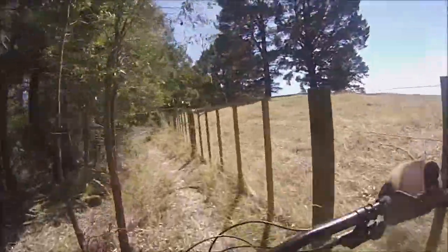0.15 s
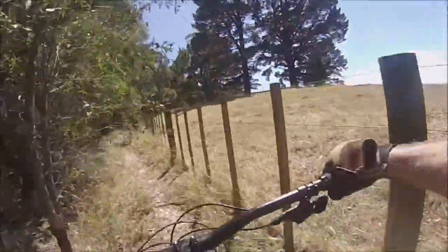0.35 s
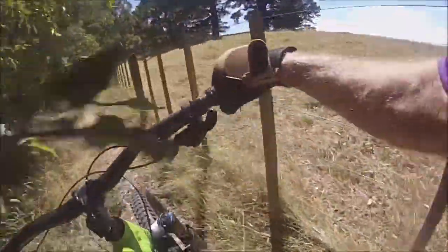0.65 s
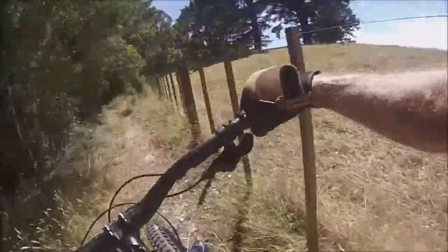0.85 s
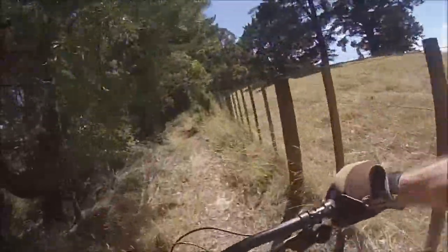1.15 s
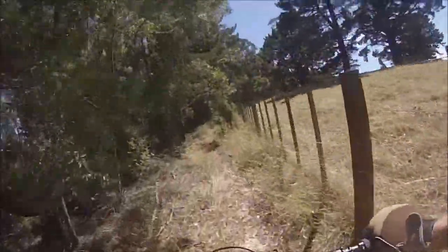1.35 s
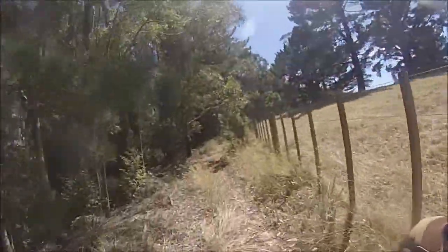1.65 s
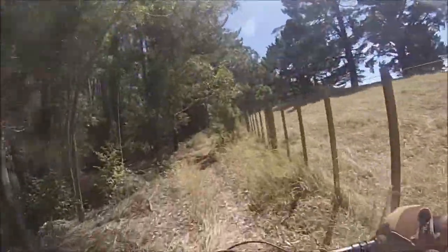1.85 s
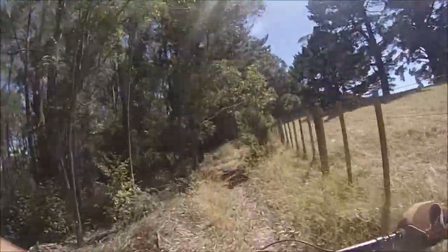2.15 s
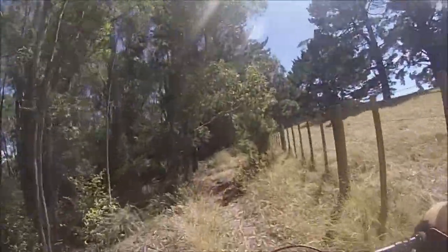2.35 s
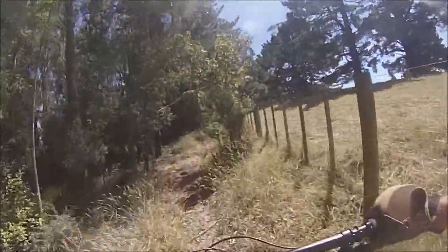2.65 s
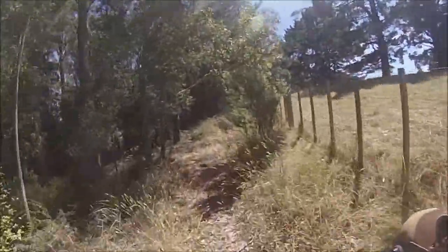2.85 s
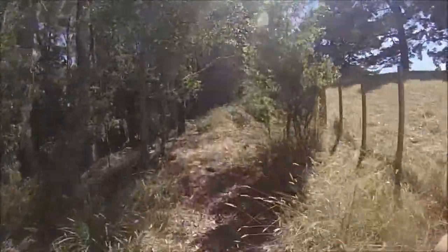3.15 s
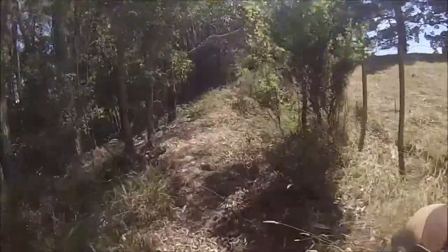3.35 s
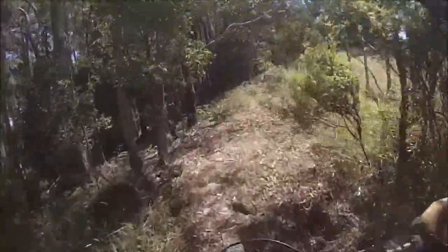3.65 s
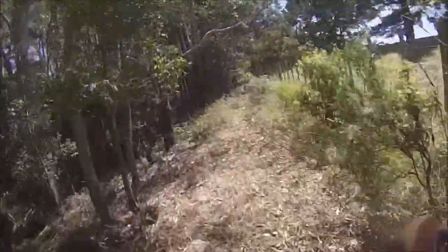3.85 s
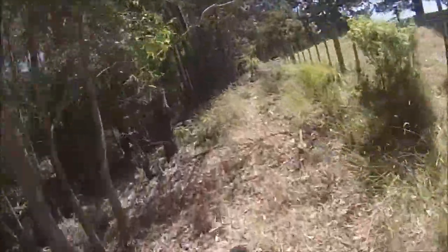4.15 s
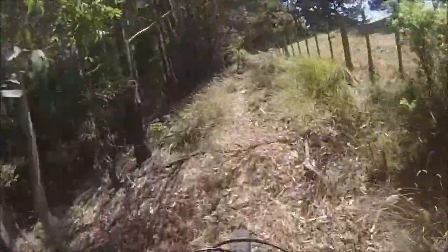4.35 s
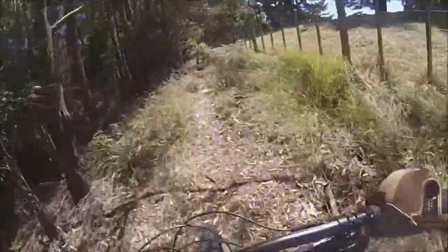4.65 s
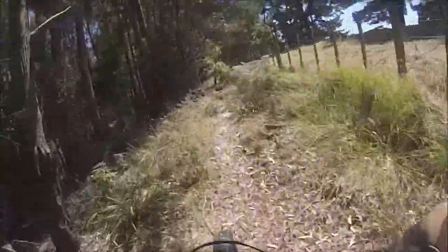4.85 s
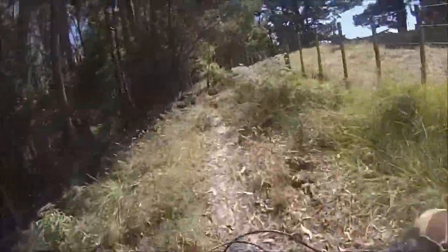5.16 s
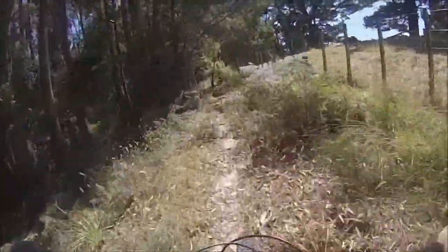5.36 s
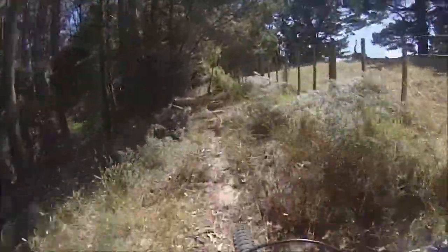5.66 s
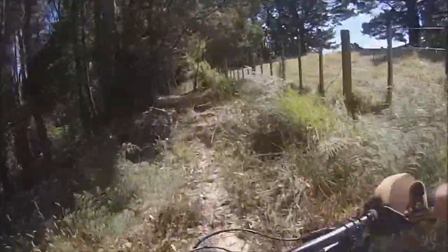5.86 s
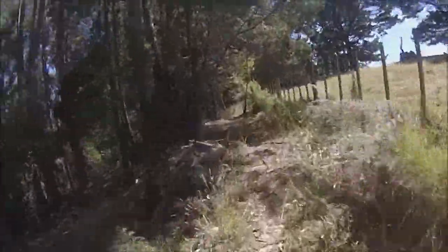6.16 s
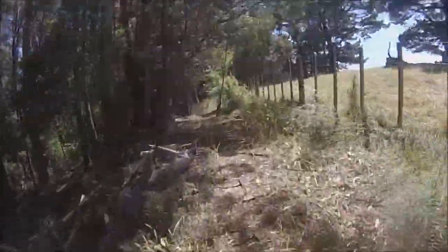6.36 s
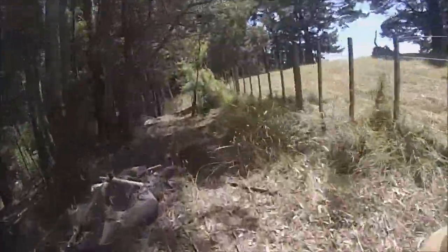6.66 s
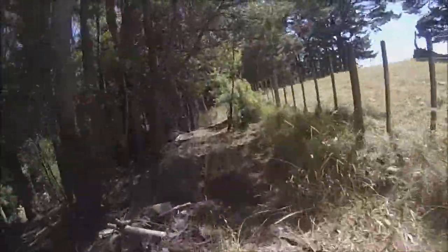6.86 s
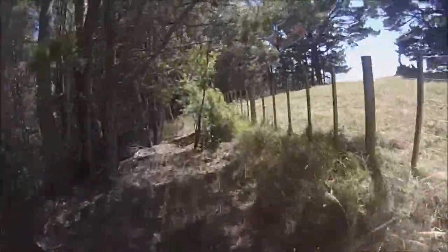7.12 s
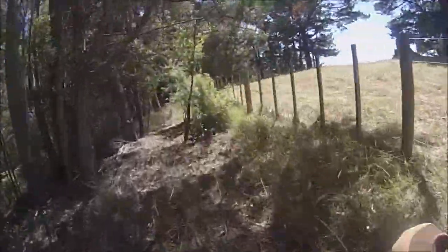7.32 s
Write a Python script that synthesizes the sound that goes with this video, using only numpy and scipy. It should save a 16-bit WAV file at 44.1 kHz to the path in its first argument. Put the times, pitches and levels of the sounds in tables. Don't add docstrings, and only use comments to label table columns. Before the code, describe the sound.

A mountain bike rattles along a dry dirt trail, its helmet camera knocking in a loose mount, with one loud branch scrape early on.

```python
import sys
import numpy as np
from scipy import signal
from scipy.fft import rfft, irfft, next_fast_len
from scipy.io import wavfile
from scipy.ndimage import uniform_filter1d, map_coordinates

SR = 44100
rng = np.random.default_rng(int(sys.argv[2]) if len(sys.argv) > 2 else 0)


def int16_out(signal):
    q = np.round(np.clip(np.atleast_2d(signal).T, -1, 1) * 32767)
    wavfile.write(sys.argv[1], SR, q.astype(np.int16))


def volts_from_decibels(level):
    exponent = np.asarray(level, float) / 20
    return 10 ** exponent


N = 330309

# freq_hz, density_db
WIND_SPECTRUM = [(4.7, -31), (8.0, 0), (30, 0.5), (41, -9.5), (59, -28), (70, -26), (91, -56), (150, -120)]
# peak_s, peak_db, half_length_s
GUSTS = [(0.02, -48, 0.079), (0.28, -32, 0.086), (0.527, -33, 0.061), (0.717, -31, 0.063),
         (0.952, -42, 0.13), (1.259, -31.5, 0.088), (1.472, -44.5, 0.19), (1.775, -42.5, 0.052),
         (1.925, -29, 0.01), (2.11, -52, 0.069), (2.333, -39, 0.054), (2.69, -40, 0.16),
         (3.067, -41, 0.092), (3.333, -36, 0.08), (3.64, -50, 0.11), (3.826, -50, 0.18), (4.138, -48, 0.14),
         (4.447, -33, 0.14), (4.736, -41, 0.047), (4.925, -45, 0.052), (5.087, -57, 0.027),
         (5.303, -44, 0.41), (5.64, -49, 0.22), (5.994, -25.5, 0.039), (6.24, -39.5, 0.089),
         (6.5, -42, 0.34), (6.858, -37.5, 0.18), (7.34, -47, 0.17)]
BREEZE_DB = -50
# freq_hz, density_db
RUMBLE_SPECTRUM = [(32, -29), (55, 5), (171, -3.5), (204, -7), (306, -14), (339, -11.5), (500, -22),
                   (650, -45.5), (1100, -120)]
# time_s, level_db
BUMPS = [(0, 4), (.45, 1), (.65, -3), (.86, 4.5), (1.3, 3.5), (1.6, -2), (2.2, 2.5), (2.32, 2), (2.85, 2),
         (3.3, -4.5), (3.6, 3), (3.85, 0.5), (4.4, -0.5), (4.85, -2.5), (5.65, 4.5), (6.05, -0.5),
         (7.2, 3.5), (7.49, -4.5)]
# freq_hz, density_db
TYRE_SPECTRUM = [(150, -33.5), (250, -3), (726, -3), (944, -5), (1390, -10), (2390, -7.5), (2740, -8.5),
                 (5000, -23.5), (6500, -48), (11000, -120)]
# freq_hz, width_hz, gain_db
CASE_AIR = [(1510, 280, 0), (2170, 150, -2.5), (2730, 120, 5.5), (3420, 340, 4.5), (3920, 120, 7)]
# freq_hz, density_db
RUSTLE_SPECTRUM = [(2650, -37), (4500, -7), (5070, -8.5), (5540, -1.5), (6510, -1.5), (7490, -7),
                   (8140, -8), (8990, -13.5), (10400, -7.5), (11700, -6.5), (12800, -16.5), (14700, -19),
                   (15600, -31.5)]
# time_s, level_db
GRASS = [(0, 0), (.27, 0.5), (.43, -0.5), (.64, 4.5), (1.2, 2.5), (1.85, -2.5), (2.18, -3), (2.5, -1),
         (3.1, 0.5), (3.62, 4), (3.8, 2.3), (4.28, 0), (4.9, 1.6), (5.15, 5), (5.95, -1), (6.25, 4),
         (6.9, -2), (7.49, -1.5)]
# peak_s, level_db, half_length_s
TUFTS = [(.18, 3.5, 0.018), (0.3, 4.5, 0.028), (3.53, 4.5, 0.013), (3.58, 2, .02), (3.71, 5, 0.016),
         (4.146, 2.5, .03), (4.28, 7, 0.08), (4.38, -0.5, 0.033), (4.535, 6, 0.019), (4.607, -2.5, .02),
         (4.64, 6, 0.017), (4.704, 4.5, .015), (5.26, 4, 0.039), (5.33, -3, .015), (5.44, -3.5, 0.037),
         (5.776, 3, 0.027), (5.85, -1, 0.0099), (6.016, -2.5, 0.044), (6.077, -1.5, 0.019),
         (6.14, -6, .015), (6.22, 3.5, 0.045), (6.322, -4, 0.028), (6.47, 5, 0.037), (6.74, -1, 0.017),
         (7.4, 1.5, .03)]
RUMBLE_DB, TYRE_DB, RUSTLE_DB = -53, -58.5, -64
TYRE_PER_BUMP, TYRE_PER_GRASS = 0.28, 0.4
DUCK_S, DUCK_DB, DUCK_HOLD_S, DUCK_RECOVER_S = 0.8, -16.5, 0.27, 0.59

# start_s, peak_db, ring_hz, t60_s
STONES_AND_GRIT = [(0.077, -41.5, 2620, 0.023), (0.2573, -30.5, 1430, 0.0051), (.8144, -65, 1940, 0.034),
                   (0.8687, -56, 812, 0.023), (.929, -54, 865, 0.029), (1.4315, -50, 2654, 0.017),
                   (1.5759, -43, 2600, 0.0075), (1.7555, -28.5, 2210, 0.0078), (2.282, -30.5, 1134, 0.012),
                   (2.366, -46, 3270, 0.011), (2.3865, -36, 900, 0.013), (2.424, -42, 2030, 0.012),
                   (3.2217, -37, 2280, 0.012), (4.0781, -44, 2680, 0.014), (4.3227, -33, 2060, 0.012),
                   (4.389, -40.5, 2660, 0.013), (4.5665, -46.5, 1400, 0.022), (5.278, -37, 2660, 0.021),
                   (5.466, -38.5, 2650, 0.014), (5.5258, -25.5, 2640, 0.014), (5.722, -49, 890, 0.0061),
                   (6.2821, -45, 2800, 0.013), (6.589, -40, 2820, 0.015), (6.77, -36.5, 2150, 0.028),
                   (6.9458, -35.5, 2220, .018), (6.9562, -35.5, 2150, 0.018), (6.9904, -29.5, 2170, 0.021),
                   (7.064, -41, 2600, 0.0068), (7.2449, -40, 2250, 0.016),
                   (.808, -57.5, 1994, .08), (1.849, -54, 2676, 0.014), (1.856, -61, 2680, 0.012),
        (1.934, -49.5, 3920, .01), (5.226, -42, 2680, 0.011), (5.265, -41, 2660, 0.017),
        (5.342, -44, 2700, .012), (5.394, -37, 3900, .015), (5.520, -41, 3730, .012),
        (5.529, -29.5, 1500, 0.013), (6.459, -43, 2700, .02), (6.474, -42, 2690, 0.018),
        (6.483, -35, 6000, 0.018), (6.488, -33, 3440, 0.027), (6.493, -38, 2920, .012),
        (6.723, -40.5, 6000, .015), (6.947, -51, 3420, .02), (6.967, -47, 3300, .02),
        (6.968, -43, 1290, .02), (6.983, -42, 1700, .012), (6.991, -42, 3200, 0.014),
        (7.059, -44, 1500, .012), (5.528, -40, 5000, 0.012), (5.278, -46, 4300, .012),
        (5.277, -44, 1200, .01), (5.396, -43, 5420, 0.05), (5.467, -41, 3650, .02),
        (5.361, -40.5, 3320, 0.016), (5.304, -49, 5900, .015), (6.781, -42, 2420, .015),
        (6.791, -45, 2200, .015), (6.947, -47, 5650, .015), (7.064, -45, 3970, 0.0092),
        (1.756, -39.5, 785, 0.016), (.94, -63, 8480, .012), (1.455, -57, 6680, .03),
        (2.283, -35, 3360, 0.011), (2.291, -41, 2500, .01), (2.389, -37.5, 2480, 0.01),
        (1.757, -34, 2320, .008), (4.333, -46, 3040, .012), (4.642, -46, 3820, 0.019),
        (6.723, -39, 1750, 0.023), (6.948, -46, 2220, 0.014)]
# start_s, peak_db, ring_hz, treble_db
STALKS = [(0.207, -53, 800, 10.5), (0.311, -42.5, 2700, -1), (1.0999, -52.5, 2157, -8),
          (1.265, -51.5, 2576, -3), (1.414, -54.5, 914, 5.5), (3.3737, -44.5, 2610, -14),
          (3.527, -40.5, 2580, 1), (3.916, -45, 1600, 0.5), (4.6246, -45, 2730, -2), (4.902, -40, 2820, 2),
          (4.9408, -45, 2150, 5), (5.2394, -36.5, 2550, -14), (5.2578, -36, 1515, 1),
          (5.359, -46, 2630, 8.5), (5.392, -32, 5430, -4.5), (5.854, -53, 2170, 6), (6.1592, -44, 2780, -6),
          (6.4584, -39.5, 730, -6), (6.482, -26.5, 3320, -1.5), (6.4938, -53, 810, 2),
          (6.533, -40, 778, -5), (6.7228, -31.5, 1854, -5.5), (6.9187, -43, 1620, -12),
          (7.337, -48, 2800, 3.5), (7.3934, -57.5, 853, 16)]
STONE_TREBLE_DB, STALK_T60_S = -22, 0.018
TICK_TOP_HZ, TICK_RING = 4000, 1.05
# start_s, peak_db, t60_s
EDGES = [(.2578, -38, .006), (1.577, -48, .006), (1.7993, -51, .01), (2.0492, -47, .008),
         (2.283, -44, 0.013), (2.389, -51, .01), (2.9502, -48, .01), (3.278, -45, .01),
         (3.446, -43.5, .015), (3.7369, -49, 0.0092), (3.8217, -45, 0.014), (4.39, -54, .006),
         (4.4513, -50, .01), (4.642, -46, .01), (4.751, -43, .015), (5.1687, -49, 0.0077),
         (5.207, -53, .006), (5.279, -42, .006), (5.351, -47, .006), (5.467, -47, .007),
         (5.5268, -42, 0.009), (5.7558, -47, .015), (6.108, -46, .02), (6.1759, -45, .015),
         (6.2128, -42.5, 0.022), (6.285, -51, .01), (6.3545, -48, .012), (6.3799, -49, .012),
         (6.946, -46, .01), (7.0329, -47.5, 0.011)]

# start_s, peak_db, t60_s
STRIKES = [(.7043, -28.5, 0.0044), (.7066, -28, 0.0056), (.7212, -17, .006), (.7262, -12.5, 0.0063),
           (.7308, -20.5, 0.0054), (.7370, -9.5, 0.0073), (.7392, -26, .006), (.7468, -12, 0.0052),
           (.7655, -6.5, 0.0067), (.7686, -4.5, 0.0059)]
# peak_s, peak_db, ring_hz, t60_s, second_ring_hz
SLIPS = [(0.7031, -9.5, 2120, 0.0081, 800), (.7068, -9.5, 1560, 0.0071, 2160),
         (.7128, -3, 663, 0.011, 2160), (0.718, -13, 1730, 0.013, 800), (0.722, -0.5, 900, .012, 2700),
         (0.7243, -3.5, 1850, 0.0072, 2680), (0.7267, -4.5, 3150, 0.0077, 5330),
         (0.731, -11.5, 2200, 0.028, 3270), (0.7367, -4.5, 1505, 0.0037, 2400),
         (0.7391, 1, 760, .014, 2270), (0.7471, -2, 1585, 0.0042, 2656), (0.759, -20.5, 1498, .015, 2080),
         (0.7665, -2.0, 2610, 0.012, 4690), (0.769, 0.5, 2754, .0075, 4740)]
# time_s, pressure_db
DRAG = [
    (.7005, -70),
    (.7035, -22),
    (.719, -24.5),
    (.75, -30.5),
    (.773, -37.5),
    (.796, -43),
    (.8005, -88),
]
# time_s, treble_db, thud_db
TAPER = [
    (.718, -22.5, -15),
    (.722, -16, -14.5),
    (.765, 2.5, -21.5),
]
# freq_hz, density_db
SCRAPE_SPECTRUM = [(88, -35.5), (150, -9.5), (243, -10.5), (478, -12.5), (823, 8.5), (1170, -14.5),
                   (1790, -7.5), (4130, -18.5), (5000, -25), (6500, -48.5), (11000, -120)]
SECOND_RING_DB, RASP_DB = -6, -6

# peak_s, peak_db, half_contact_ms
BACK = [(0.025, -26, 1.3), (0.0928, -26, 1.3), (0.1262, -17, 0.51), (0.1746, -29, 1.9), (.2322, -10, 0.29),
        (0.5057, -10.5, 0.28), (0.6183, -22, 0.87), (0.664, -16.5, 0.47), (2.535, -33.5, 1.7),
        (2.6903, -17, 0.44), (2.7363, -17, 0.41), (2.836, -27.5, 1.6), (2.906, -13, 0.42),
        (2.986, -17, 0.56), (4.059, -15, 0.32), (4.186, -14.5, 0.36), (4.244, -22.5, 0.68),
        (4.3076, -29, 1.2), (4.362, -18, 0.52), (5.1848, -32, 0.26), (5.5188, -18, 0.48),
        (5.728, -30.5, 1.05), (5.9557, -7.5, 0.19), (5.9804, -29, 0.48), (6.0537, -20.5, 0.7),
        (6.7747, -33.5, 0.59), (6.9419, -16.5, 0.46), (7.0355, -14.5, 0.34), (7.2947, -15.5, 0.41),
        (7.3761, -19.5, 0.58)]
# peak_s, peak_db, half_contact_ms
FORTH = [(0.633, -36, 0.96), (0.9354, -39, 0.19), (1.032, -22.5, 0.27), (1.077, -37, 0.72),
         (1.9208, -8.5, 0.35), (2.1242, -10.5, 0.31), (2.584, -42, 0.97), (3.3038, -6.5, 0.31),
         (3.456, -18, 0.82), (3.802, -32.5, 0.62), (3.8347, -9.5, 0.32), (4.997, -32, 0.56),
         (5.06, -9.5, 0.28), (5.1296, -19.5, 0.44), (5.2592, -29, 0.18), (5.372, -33.5, 0.38),
         (5.58, -41, .93), (5.6536, -33, 0.37), (6.1533, -37.5, 0.65), (6.34, -32, 0.65),
         (6.3647, -9.5, 0.34), (6.5143, -16, 0.47), (6.565, -18, 0.6), (6.663, -39, 0.79),
         (6.995, -28, 0.4)]
# freq_hz, width_hz, gain
MOUNT = [(155, 92, .78), (84, 9, -1.3), (1050, 800, .3)]
# freq_hz, width_hz, gain_db
CLACK = [(900, 240, 11.5), (1600, 790, -2.5), (2140, 660, -6.5), (2980, 450, -11)]
# freq_hz, width_hz, gain_db
SHUDDER = [(45, 30, 0), (110, 60, -3), (320, 80, -20), (620, 140, -28)]

# time_s, top_hz
KEPT = [
    (.80, 15700),
    (.81, 14500),
    (.93, 14300),
    (.96, 13100),
    (1.21, 13500),
    (1.24, 15000),
    (1.55, 15100),
    (1.7, 15700),
]
KEPT_RAGGED_HZ, TOP_HZ = 250, 15350
# time_s, spared_below_hz, gap_ms, line_db,
# surviving_lines_hz
DROPOUTS = [(.972, 600, 42, -77, [820, 1570, 2230, 2670]), (2.166, 1700, 24, -68, [3490, 6940]),
            (2.275, 1000, 34, -62, [1970, 2690, 3560, 3910, 5080]),
            (3.553, 500, 16, -63, [730, 1620, 2690, 5670, 6160, 6870, 11700]),
            (3.598, 600, 38, -64, [2720, 3470, 5900, 6840, 10030, 11930]),
            (3.660, 450, 22, -60, [585, 940, 2270, 2770, 3490]),
            (3.720, 500, 40, -61, [1450, 2020, 2790, 3230, 3490, 5580]),
            (4.235, 350, 22, -56, [445, 2180, 2670, 10260]),
            (4.512, 900, 22, -62, [1570, 3890, 5340, 5760, 6070, 6350, 6800]),
            (4.672, 500, 66, -62, [1100, 2720, 3440, 3890, 5410, 6770, 11300]),
            (4.727, 900, 22, -63, [1970, 2600, 3210, 3510, 3870, 6940]),
            (5.878, 2000, 24, -68, [2530, 2740, 3330])]


def unit(x):
    return x / np.sqrt(np.mean(x ** 2) + 1e-20)


def along(points, hz):
    f, v = np.transpose(points)
    return np.interp(np.log(hz + 1), np.log(f + 1), v)


def curves(rows):
    s, *columns = np.transpose(rows)
    return [np.interp(np.arange(N) / SR, s, column) for column in columns]


def wobble(rate):
    return map_coordinates(rng.standard_normal(int(N * rate / SR) + 4), [np.arange(N) * rate / SR])


def filtered(x, response):
    m = next_fast_len(len(x) + 8192)
    return irfft(rfft(x, m) * response(np.fft.rfftfreq(m, 1 / SR)), m)[:len(x)]


def peak(f, hz, width):
    return 1j * f * width / (hz * hz - f * f + 1j * f * width)


def lumps(rows):
    t = np.arange(N) / SR
    return [(value, np.exp(-((t - s) / half) ** 2)) for s, value, half in rows]


def rush(spectrum, patchy_db, grit=0, per_s=300):
    size = volts_from_decibels(3.3 * np.minimum(rng.exponential(size=N), 3))
    grains = (rng.random(N) < per_s / SR) * rng.standard_normal(N) * size
    z = signal.stft(rng.standard_normal(N) + grit * unit(grains), nperseg=512)[2]
    field = uniform_filter1d(rng.standard_normal(z.shape), size=10, axis=0)
    field = uniform_filter1d(field, size=5, axis=1)
    x = signal.istft(z * volts_from_decibels(patchy_db * unit(field)), nperseg=512)[1][:N]
    return unit(filtered(x, lambda hz: volts_from_decibels(along(spectrum, hz))))


def duck():
    t = np.arange(N) / SR
    recovery = (t - DUCK_S - DUCK_HOLD_S) / DUCK_RECOVER_S
    return DUCK_DB * (t > DUCK_S) * np.clip(1 - recovery, 0, 1)


def wind():
    strength = volts_from_decibels(BREEZE_DB) + sum(volts_from_decibels(db) * swell for db, swell in lumps(GUSTS))
    return strength * unit(volts_from_decibels(2 * wobble(9.5)) * rush(WIND_SPECTRUM, patchy_db=2.0))


def rumble(bump_db):
    level_db = RUMBLE_DB + bump_db + 0.78 * wobble(25)
    return volts_from_decibels(level_db) * rush(RUMBLE_SPECTRUM, patchy_db=-0.5, grit=0.6, per_s=21)


def tyres(level_db):
    air = lambda f: 1 + sum(volts_from_decibels(db) * peak(f, hz, width) for hz, width, db in CASE_AIR)
    hiss = rush(TYRE_SPECTRUM, patchy_db=1.2, grit=0.4, per_s=250)
    return volts_from_decibels(level_db) * unit(filtered(hiss, air))


def grass(level_db):
    flutter_db = 1.6 * wobble(60)
    return volts_from_decibels(level_db + flutter_db) * rush(RUSTLE_SPECTRUM, patchy_db=1.3, grit=0.45, per_s=600)


def ride():
    (bump_db,), (grass_db,) = curves(BUMPS), curves(GRASS)
    grass_db = grass_db + sum(db * swell for db, swell in lumps(TUFTS))
    rough = wobble(22)
    tyre_db = TYRE_DB + TYRE_PER_BUMP * bump_db + TYRE_PER_GRASS * grass_db + 1.2 * rough
    rustle_db = RUSTLE_DB + grass_db + 0.6 * rough
    return volts_from_decibels(duck()) * (wind() + rumble(bump_db) + tyres(tyre_db) + grass(rustle_db))


def snaps(rows):
    out, t = np.zeros(N + SR), np.arange(2500) / SR
    for s, db, hz, treble_db, t60 in rows:
        shape = volts_from_decibels(-60 * t / t60) * (1 - np.exp(-t / 0.0008)) ** 2
        a, b = rng.standard_normal((2, len(t)))
        top_hz = max(TICK_TOP_HZ, 1.3 * hz)
        broad = lambda f: peak(f, 1000 + 0.4 * hz, 2200 + 0.6 * hz) ** 3 / (1 + (f / top_hz) ** 5)
        burst = filtered(a, lambda f: broad(f) + volts_from_decibels(4) * peak(f, hz, 0.15 * hz) ** 2)
        body = shape * (unit(burst) + TICK_RING * np.sin(2 * np.pi * hz * t))
        fizz = shape * filtered(b, lambda f: volts_from_decibels(0.85 * along(RUSTLE_SPECTRUM, f)))
        tick = body / abs(body).max() + volts_from_decibels(treble_db) * fizz / abs(fizz).max()
        out[round(s * SR):][:len(t)] += volts_from_decibels(db) * tick
    return out[:N]


def stones_and_grit():
    return snaps([(s, db, hz, STONE_TREBLE_DB, t60) for s, db, hz, t60 in STONES_AND_GRIT])


def stalks():
    return snaps([(*row, STALK_T60_S) for row in STALKS])


def crackle(rows):
    out, t = np.zeros(N + SR), np.arange(1500) / SR
    colour = lambda f: volts_from_decibels(0.35 * along(RUSTLE_SPECTRUM, f)) * peak(f, 9000, 8000)
    for s, db, t60 in rows:
        shape = volts_from_decibels(-60 * t / t60) * (1 - np.exp(-t / 0.0004)) ** 2
        fizz = shape * filtered(rng.standard_normal(len(t)), colour)
        out[round(s * SR) - 20:][:len(t)] += volts_from_decibels(db) * fizz / abs(fizz).max()
    return out[:N]


def leaf_drag(bright_db):
    (pressure_db,) = curves(DRAG)
    flutter_db = 1.5 * wobble(300)
    wall = lambda f: volts_from_decibels(-11.0) + peak(f, 2500, 1500)
    scrape = unit(filtered(rush(SCRAPE_SPECTRUM, patchy_db=-2.0), wall))
    leaves = volts_from_decibels(bright_db - 2.5) * rush(RUSTLE_SPECTRUM, patchy_db=4)
    return volts_from_decibels(pressure_db + flutter_db) * (scrape + leaves)


def branch():
    bright_db, heavy_db = curves(TAPER)
    out = leaf_drag(bright_db)
    t = np.arange(-400, 1600) / SR
    for s, db, hz, t60, second_hz in SLIPS:
        i = round(s * SR)
        shape = np.where(t < 0, np.exp(-(t / (0.14 * t60)) ** 2), volts_from_decibels(-60 * (t / t60) ** 1.3))
        a, b = rng.standard_normal((2, len(t)))
        ring = np.cos(2 * np.pi * hz * t + 6 * a[0])
        ring += volts_from_decibels(SECOND_RING_DB) * np.cos(2 * np.pi * second_hz * t + 6 * a[1])
        ring += volts_from_decibels(RASP_DB) * unit(filtered(a, lambda f: peak(f, 2000, 4500) / (1 + (f / 4800) ** 6)))
        body = shape * ring
        fizz = shape ** 1.5 * filtered(b, lambda f: volts_from_decibels(0.75 * along(RUSTLE_SPECTRUM, f)))
        slip = body / abs(body).max() + volts_from_decibels(bright_db[i] - 7) * fizz / abs(fizz).max()
        jolt = (t / 0.0019) ** 2
        thud = (2 * jolt - 1) * np.exp(-jolt)
        out[i - 400:][:len(t)] += volts_from_decibels(db - 2.2) * slip + volts_from_decibels(db + heavy_db[i] - 0.5) * thud
    return out


def knocks():
    out, t = np.zeros(N + SR), np.arange(-300, 8000) / SR
    arm = lambda f: sum(gain * peak(f, hz, width) for hz, width, gain in MOUNT)
    low_cut = lambda f: -f * f / (15 ** 2 - f * f + 9.4j * f)
    shell = lambda f: sum(volts_from_decibels(db) * peak(f, hz, width) for hz, width, db in CLACK) / (1 + (f / 3700) ** 10)
    helmet = lambda f: sum(volts_from_decibels(db) * peak(f, hz, width) ** 2 for hz, width, db in SHUDDER)
    clack_shape = volts_from_decibels(-60 * abs(t - 0.0005) / np.where(t > 0.0005, 0.016, 0.004))
    shake_shape = volts_from_decibels(-60 * t / 0.12) * np.clip(t / 0.003, 0, 1)
    for s, db, ms, way in [(*k, -1) for k in BACK] + [(*k, 1) for k in FORTH]:
        late_s = 0.00105 * (1 + 0.04 * rng.standard_normal())
        rebound = lambda f: 0.54 * np.exp(-2j * np.pi * f * late_s - (f / 1700) ** 2)
        contact = np.where(t < 0, (1 + (t * 766 / ms) ** 2) ** -1.5, np.exp(-(t * 900 / ms) ** 2))
        push = filtered(contact, lambda f: (1 + rebound(f) + arm(f)) * low_cut(f))
        clack = filtered(rng.standard_normal(len(t)), shell) * clack_shape
        shake = unit(filtered(rng.standard_normal(len(t)), helmet)) * shake_shape
        blow = way * push / push.max() + volts_from_decibels(-5.0 - 43.0 * ms) * clack + volts_from_decibels(-22.0) * shake
        out[round(s * SR):][:len(t)] += volts_from_decibels(db) * blow
    return out[300:N + 300]


def scene():
    near = stones_and_grit() + stalks() + crackle(STRIKES + EDGES)
    return (ride() + near + branch() + knocks())[None]


def thin_top(x):
    hz, t, z = signal.stft(x, SR, nperseg=1024)
    ragged = np.minimum(rng.standard_normal(len(t)) ** 2, 4) * (t > DUCK_S)
    top_hz = np.interp(t, *np.transpose(KEPT)) - KEPT_RAGGED_HZ * ragged
    return signal.istft(z * (hz[:, None] < top_hz + KEPT_RAGGED_HZ / 2), SR, nperseg=1024)[1][:N]


def drop_out(x):
    x, t = x.copy(), np.arange(-2000, 2000) / SR
    for s, spared_hz, gap_ms, line_db, lines_hz in DROPOUTS:
        part = x[round(s * SR) - 2000:][:len(t)]
        gap = np.cos(np.pi * np.clip(t * 1000 / gap_ms, -0.5, 0.5)) ** 2
        hold = np.cos(np.pi * np.clip(t / max(0.046, gap_ms / 1200), -0.5, 0.5)) ** 2
        lines = np.zeros(len(t))
        for hz in lines_hz:
            level = volts_from_decibels(line_db - hz / 4000 + 1.5 * rng.standard_normal())
            lines += level * np.sin(2 * np.pi * hz * t + 6 * rng.random())
        depth = np.minimum(gap_ms / 45 * gap, 1) ** 0.35 * min(0.5 + gap_ms / 60, 1)
        depth = depth * np.minimum(1.1 * gap, 1)
        part += hold * lines - depth * filtered(part, lambda f: f > spared_hz)
    return x


def band_limit(x):
    return signal.sosfilt(signal.butter(12, 16250, fs=SR, output="sos"), x)


def record(dry):
    held = dry[0] / (1 + abs(dry[0] / 0.92) ** 6) ** (1 / 6)
    limited = filtered(held, lambda hz: 1 / (1 + (hz / TOP_HZ) ** 120))
    mix = drop_out(thin_top(limited))[None]
    return band_limit(mix)


dry = scene()
out = record(dry)
int16_out(out)
```